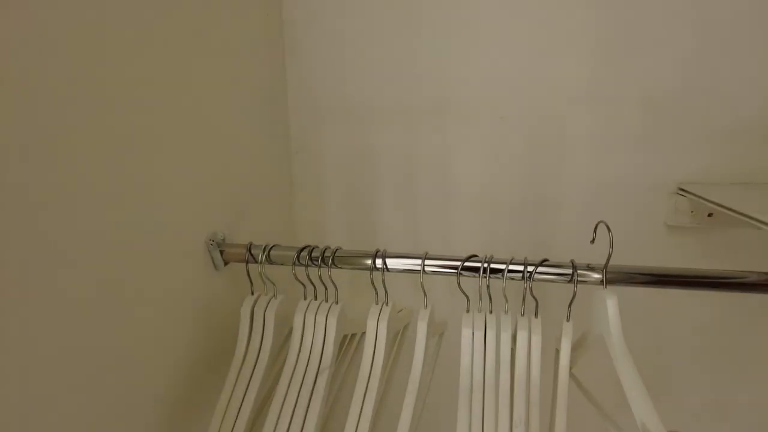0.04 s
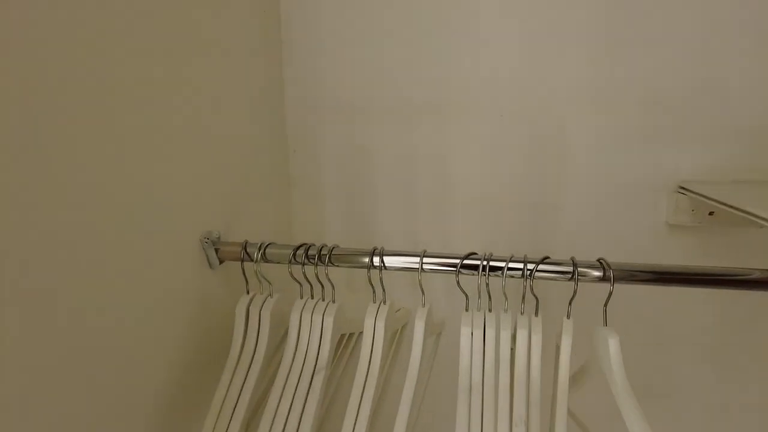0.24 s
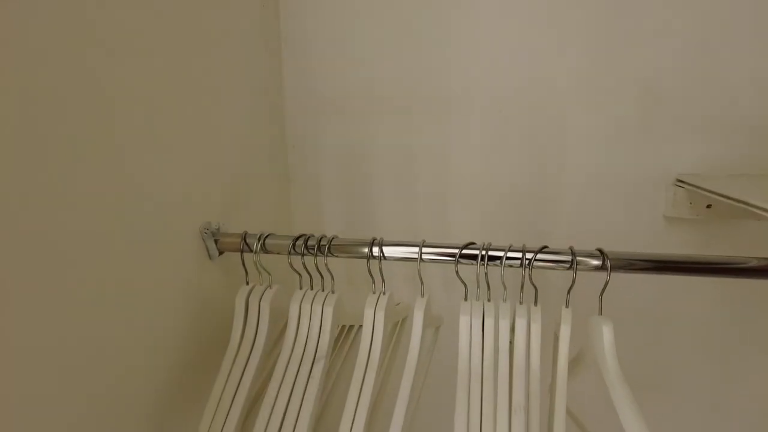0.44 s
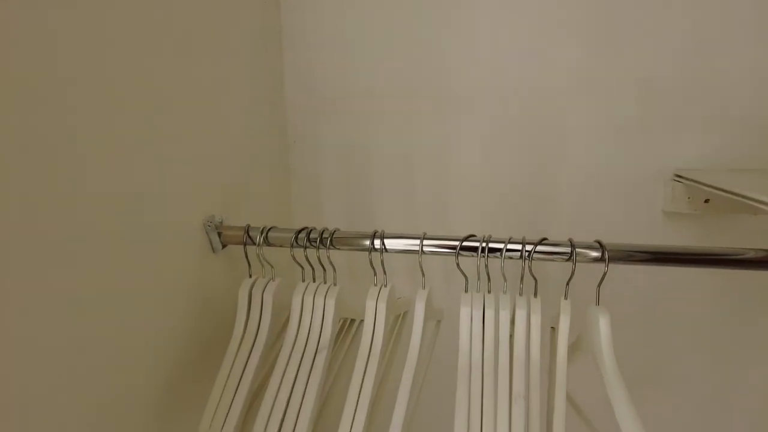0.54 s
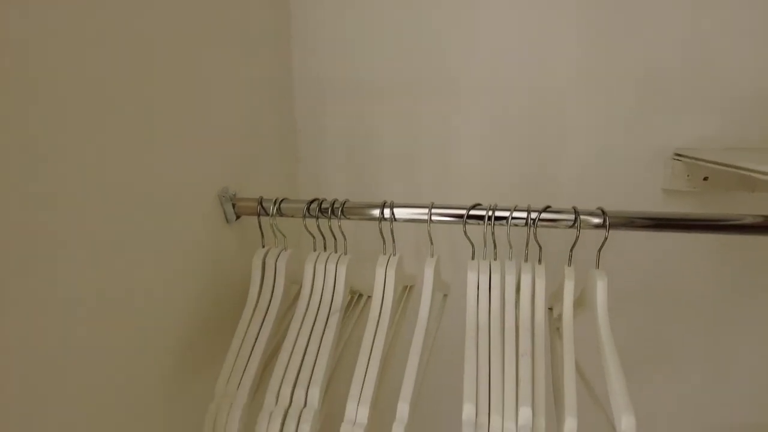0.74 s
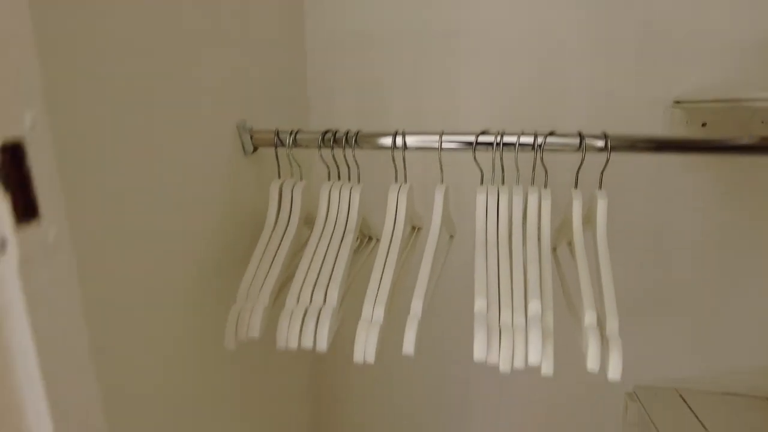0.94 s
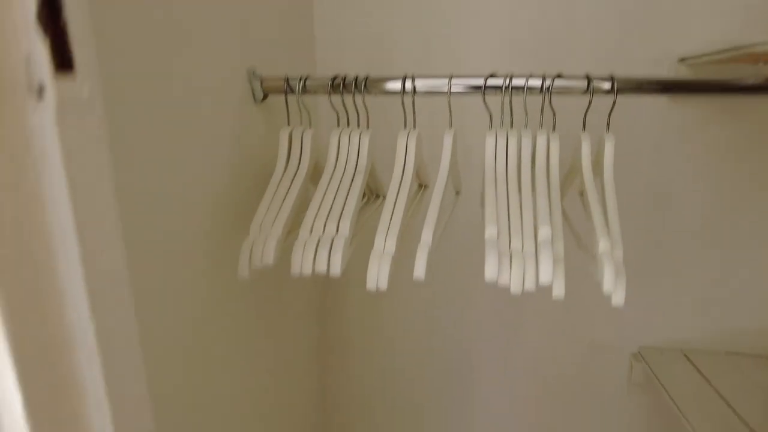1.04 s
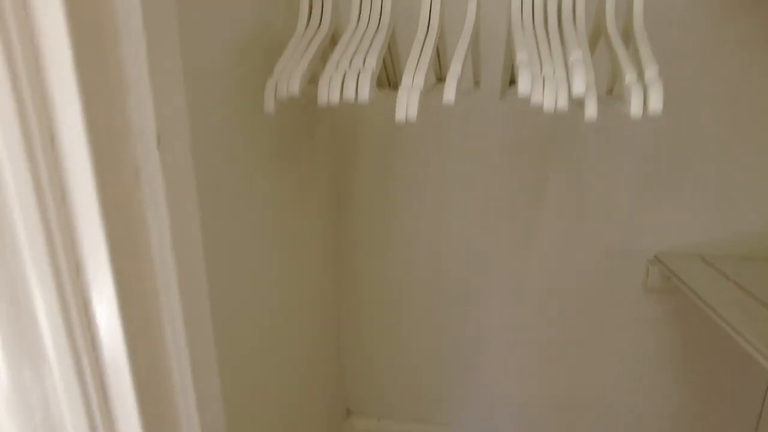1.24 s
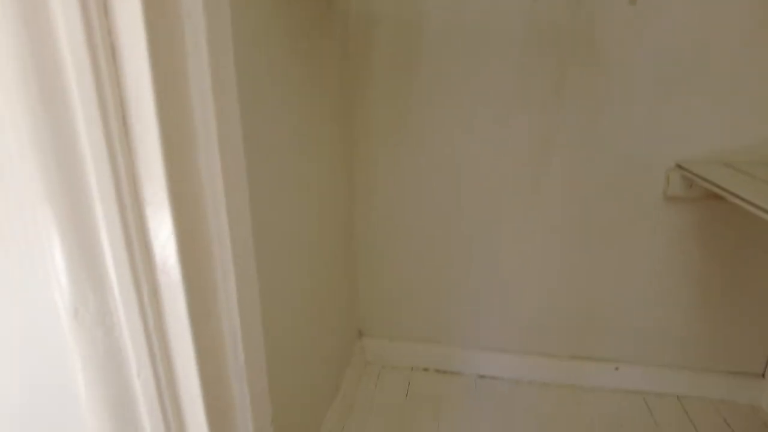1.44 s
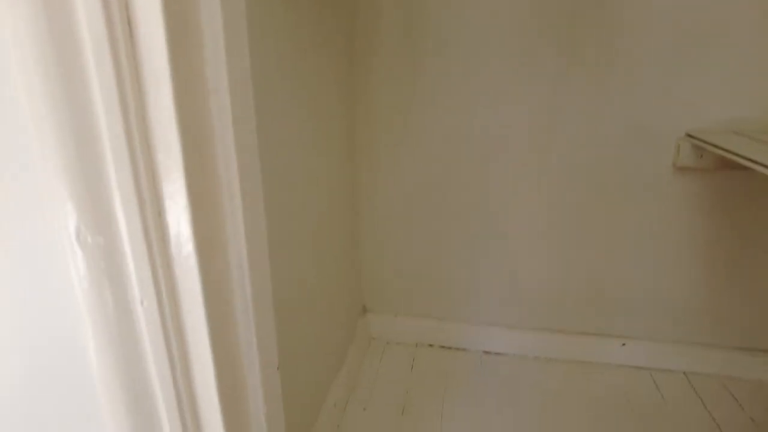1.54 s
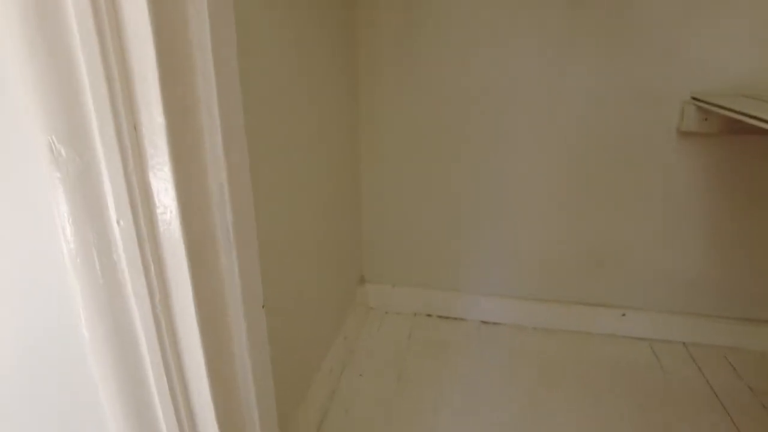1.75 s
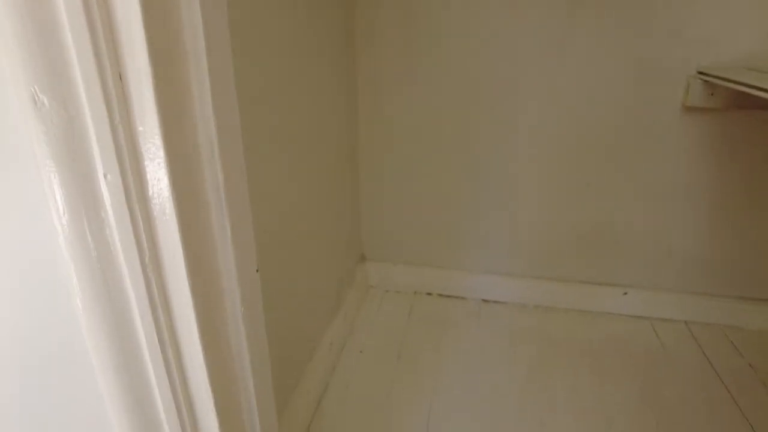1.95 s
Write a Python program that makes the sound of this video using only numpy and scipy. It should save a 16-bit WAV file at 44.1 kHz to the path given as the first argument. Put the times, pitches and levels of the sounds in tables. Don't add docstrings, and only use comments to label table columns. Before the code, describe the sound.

A wire hanger hook clacks sharply onto a hollow steel rail, bounces and rings, then hangers tick faintly and a thin plastic bag rustles briefly; small bare closet, close handheld microphone with low grip rumble.

```python
import sys
import numpy as np
from scipy import signal
from scipy.fft import rfft, irfft
from scipy.io import wavfile
from scipy.ndimage import uniform_filter1d

SR = 44100
rng = np.random.default_rng(int(sys.argv[2]) if len(sys.argv) > 2 else 0)


def digitize_waveform(pressure):
    field = np.atleast_2d(pressure).T
    bounded = np.clip(field, -1, 1)
    quanta = np.round(bounded * 32767).astype(np.int16)
    wavfile.write(sys.argv[1], SR, quanta)


def volts_from_db(level):
    exponent = np.asarray(level, float) / 20
    return 10 ** exponent


N = 88200


def unit(x):
    return x / np.sqrt(np.mean(x ** 2))


def colour(x, table):
    hz, db = np.array(table, float).T
    f = np.maximum(np.fft.rfftfreq(x.shape[-1], 1 / SR), 1)
    gain = volts_from_db(np.interp(np.log(f), np.log(hz), db))
    return irfft(rfft(x) * gain, x.shape[-1])


def pair(mid, side, table):
    side = colour(side, table)
    return np.array([mid + side, mid - side])


def walk(rate_hz):
    k = int(SR / rate_hz)
    steps = np.repeat(rng.standard_normal(N // k + 1), k)
    return unit(uniform_filter1d(uniform_filter1d(steps, k), k)[:N])


def ring(times, dbs, modes, rise_s, echo_db, echo_t60_s, waver_hz):
    t = np.arange(SR) / SR
    ports = np.array([[.5j], [-.5j]])
    push = np.zeros((1, N))
    push[0, (np.array(times) * SR).astype(int)] = volts_from_db(np.array(dbs))

    def fade(t60_s):
        return np.exp(-np.log(1000) * t / t60_s)

    body = 0
    for hz, db, t60_s, lead in modes:
        a, b, c = (walk(waver_hz)[:SR] for _ in range(3))
        echo = volts_from_db(echo_db) * fade(echo_t60_s) * (a + 1j * b) * np.exp(lead * c * ports)
        waver = 0.9 * min(hz / 700, 1) * (c - c[0])
        direct = fade(t60_s) * np.exp(lead * ports + 1j * waver)
        body = body + volts_from_db(db) * np.imag((direct + echo) * np.exp(2j * np.pi * hz * t))
    swell = 1 - np.exp(-t / rise_s)
    return signal.fftconvolve(push, body * swell, axes=1)[:, :N]


def grains(rate_per_s, spread_db):
    hit, size, sign = rng.random((3, N))
    level = volts_from_db(-spread_db * np.log(size + 1e-9))
    return unit((hit < rate_per_s / SR) * level * (sign - .5))


def bursts(times, dbs, lengths, lead_in_db):
    t = np.arange(N) / SR
    level = 0
    for s, db, length in zip(times, dbs, lengths):
        lead_in = volts_from_db(lead_in_db) * np.exp(np.minimum(t - s, 0) / 0.0042)
        level = level + volts_from_db(db) * np.where(t >= s, np.exp(-((t - s) / length) ** 2), lead_in)
    return level


# pitch_hz, level_db (per Hz)
AIR_COLOUR = [(12, -24.5), (20, 0.5), (210, -5), (459, -14.5), (1000, -25), (1330, -17), (1900, -25.5),
              (3840, -28), (16000, -41)]
# pitch_hz, side_minus_mid_db
AIR_SIDE = [(60, -26.5), (110, -19), (200, -8), (380, -13), (700, 4.5), (1290, -1.5), (2380, -2),
            (4400, -2), (8120, -2), (15000, 1.5)]
# start_s, level_db
GRIP = [(0.0, -37.5), (0.158, -78), (0.19, -49.5), (0.27, -52), (0.45, -54), (0.47, -47.5), (0.779, -61.5),
        (1.15, -58), (1.19, -71.5), (1.22, -61), (1.35, -45), (1.37, -55.5), (1.68, -47), (1.72, -59),
        (1.75, -53), (2.0, -66)]


def room_and_grip():
    air = unit(pair(*colour(rng.standard_normal((2, N)), AIR_COLOUR), AIR_SIDE))
    rumble = unit(colour(rng.standard_normal(N), [(12, -16.0), (33, 15.5), (60, -8), (120, -45.5)]))
    air = air * volts_from_db(-62.5 + 0.53 * walk(6))
    s, db = np.array(GRIP).T
    hold_db = np.interp(np.arange(N) / SR, s, db)
    return air + rumble * volts_from_db(hold_db - 5.5 + 1.2 * walk(6.5))


# start_s, level_db
BAG_EFFORT = [
    (1.522, -93),
    (1.539, -49.5),
    (1.565, -41.5),
    (1.593, -31),
    (1.626, -35.5),
    (1.678, -36.5),
    (1.698, -54.5),
    (1.749, -46),
    (1.868, -57.5),
]
# pitch_hz, level_db (per Hz)
BAG_COLOUR = [(100, -6), (250, -3.5), (500, -1), (850, -8.5), (1300, -4), (3000, -5), (8000, -5),
              (16000, -17.5)]


def bag():
    s, db = np.array(BAG_EFFORT).T
    effort = volts_from_db(np.interp(np.arange(N) / SR, s, db, left=-120) - 6.5 + 0.92 * walk(40))
    crinkles = grains(rate_per_s=9000, spread_db=1.6)
    return unit(colour(crinkles, BAG_COLOUR)) * effort


# start_s, level_db, length_s, pitch_hz (centre)
SCRAPES = [(.001, -37, 0.012, 1000), (.002, -42, 0.014, 4800), (.016, -34.5, .012, 684),
           (0.111, -52.5, 0.02, 4200), (.128, -46.5, 0.016, 4400), (.152, -63, 0.03, 4000),
           (0.132, -59.5, 0.078, 9617), (0.495, -60, 0.021, 9202), (0.539, -49, 0.0064, 1695),
           (0.567, -70, 0.099, 5970), (1.035, -78, .012, 2200), (1.023, -61, 0.0065, 2900),
           (1.023, -61, 0.008, 6000), (1.14, -54.5, 0.011, 2750), (1.141, -69.5, 0.012, 6200),
           (1.356, -67.5, 0.052, 1957), (1.446, -66.5, 0.04, 5180), (1.46, -63.5, 0.065, 2335),
           (1.621, -35, 0.008, 1180), (1.904, -46.5, 0.0019, 4300), (1.909, -57, 0.02, 166),
           (1.907, -47.5, 0.015, 1700), (1.982, -47.5, 0.0093, 2860), (1.993, -47.5, 0.02, 2000),
           (1.96, -56, 0.057, 7700), (.43, -61, 0.08, 5340)]


def scrapes():
    out = 0
    for s, db, length_s, hz in SCRAPES:
        slope = [(hz / 64, -6 * 8), (hz, 0), (hz * 64, -6 * 13)]
        rub = unit(colour(rng.standard_normal(N), slope))
        out = out + rub * bursts([s], [db - 2.5], [length_s], lead_in_db=-28.5)
    return out


# start_s, pitch_hz, level_db, t60_s
CLINKS = [(0.206, 1850, -23.5, 0.045), (0.213, 1327, -23.5, 0.067), (.296, 857, -25, 0.18),
          (.303, 1054, -31, 0.088), (.285, 602, -41, 0.091), (.383, 880, -28, 0.11),
          (.548, 4300, -61.5, 0.1), (.63, 4300, -69.5, .4), (1.022, 2900, -62, .04),
          (1.138, 1925, -53, 0.057), (1.141, 3380, -50, .04), (1.905, 4400, -53.5, 0.042),
          (1.906, 2240, -52, 0.036), (1.91, 1700, -56, 0.099), (1.91, 161, -51.5, 0.24)]


def clinks():
    out = 0
    for s, hz, db, t60_s in CLINKS:
        out = out + ring([s], [db], [(hz, 0, t60_s, .7)], 0.00094, echo_db=-16, echo_t60_s=0.1, waver_hz=100)
    return out


# start_s, ring_db, thump_db
TICKS = [
    (1.142, -53.5, -95),
    (1.174, -63, -65.5),
    (1.211, -72, -81),
    (1.339, -77.5, -83),
    (1.444, -72, -78.5),
    (1.906, -63, -60.5),
]
# pitch_hz, level_db, t60_s, left_lead_rad
PLASTIC = [(880, -9.5, 0.58, 1), (1283, 2, 0.31, 0.72), (1490, -16.5, 0.1, .5), (1770, -3.5, 0.13, 0.37),
           (1884, 5, 0.064, 0.57), (2000, -9, 0.14, .7), (2568.5, -11, 0.065, 0.78),
           (2680, -27, 0.054, 0.84), (3343, 1.5, 0.016, 0.9), (4200, -21.5, .03, 0.82),
           (6560, -22, .04, .8)]
# pitch_hz, level_db, t60_s, left_lead_rad
WALL = [(99.2, -5, 0.68, .05), (132.5, -11.5, 0.087, .1), (170.9, -6.5, 0.83, .15),
        (185.2, -1.5, 0.19, .15), (210.8, 7, 0.4, 0.18), (261.6, 2, 0.2, 0.5), (278.26, -4, .25, 0.31),
        (326.3, -2, 0.3, 0.83), (420.3, -11.5, 0.12, 0.84), (507, -5.5, 0.22, 1)]


def hangers():
    s, ring_db, thump_db = np.array(TICKS).T
    shoulder = ring(s, ring_db, PLASTIC, 0.001, echo_db=-9.5, echo_t60_s=0.21, waver_hz=160.5)
    thump = ring(s, thump_db, WALL, 0.0023, echo_db=1.5, echo_t60_s=0.13, waver_hz=79)
    return shoulder + thump


# pitch_hz, level_db, t60_s, left_lead_rad
NEIGHBOUR = [(4330, -62, 0.0947, 1.266), (3042.5, -63.5, 0.29, 3.2), (1545, -56, .06, 0.55),
             (1870, -57, 0.056, 0.77), (4300, -80, 0.97, 1.357)]


def neighbour_hook():
    return ring([.546], [0], NEIGHBOUR, 0.0011, echo_db=-17, echo_t60_s=0.75, waver_hz=57)


# pitch_hz, level_db, t60_s, left_lead_rad
KNOCK = [(272, -34, .14, 0.33), (327, -28.5, 0.083, 0.74), (496, -43.5, .2, .9), (605, -34, .2, 1.1),
         (855, -30.5, 0.15, 1.1), (1064, -44.5, 0.12, .8), (1427, -50.5, .3, .7), (1700, -43.5, 0.096, .6)]


def knock():
    return ring([.014], [0], KNOCK, 0.0024, echo_db=-17, echo_t60_s=.5, waver_hz=45)


# start_s, chatter_db, chatter_length_s, rail_ring_db, wall_thump_db
HOOK = [
    (.013, -52, 0.004, -50, -41),
    (.208, -12.5, 0.016, -15, -32.5),
    (.224, -33.5, 0.0074, -24, -32),
    (.236, -26.5, 0.012, -30, -37),
    (.273, -22.5, 0.011, -35, -39.5),
    (.285, -30, 0.014, -40.5, -44),
    (0.296, -40, 0.014, -30, -42),
    (.322, -37.5, 0.012, -57, -47),
    (.385, -53.5, 0.02, -41, -50),
]
# pitch_hz, level_db (per Hz)
CHATTER_COLOUR = [(300, -12), (900, -8.5), (1900, -7), (2300, -9), (4000, -6), (6000, -5), (9000, -1.5),
                  (16000, -17)]


def hook_chatter():
    s, db, length_s, _, _ = np.array(HOOK).T
    clicks = grains(rate_per_s=12000, spread_db=1.6)
    return unit(colour(clicks, CHATTER_COLOUR)) * bursts(s, db - 2.5, length_s, lead_in_db=-10)


def wall_ring():
    s, _, _, _, wall_db = np.array(HOOK).T
    return ring(s + 0.0069, wall_db, WALL, 0.0082, echo_db=-12.0, echo_t60_s=0.71, waver_hz=40)


# pitch_hz, level_db, t60_s, left_lead_rad
WIRE = [(3145, -10, 1, .8), (3227, 0.5, 0.35, 1.4), (3978, -2.5, 0.17, 0.84), (5540, -14, .55, 0.54),
        (6760, -10, 0.22, 1.2), (7720, 4.5, 0.2, 1.2), (9000, -3.5, .13, 1.4), (11200, -5, 0.11, 1.3),
        (11800, -4.5, .12, 1.1)]


def wire_ring():
    s, db, _, _, _ = np.array(HOOK).T
    return ring(s, db - 22.5, WIRE, .003, echo_db=-29, echo_t60_s=0.51, waver_hz=45)


# pitch_hz, level_db, t60_s, left_lead_rad
RAIL = [(575, -9, 0.42, 3.7), (616.5, 2.5, .22, 1.1), (737, -2, 0.18, 1.2), (785, -4, 0.22, 1.8),
        (834.6, 9, 0.1, 0.82), (913, 0, 0.086, 1.1), (1075, -16, 0.2, .8), (1329.3, -9.5, 0.12, 0.64),
        (1800, -11, 0.05, 0.55), (1874, -15.5, 0.25, 0.55), (2464, -16, 0.3, 0.55),
        (2870, -15.5, 0.3, 0.43)]


def rail_ring():
    s, _, _, rail_db, _ = np.array(HOOK).T
    return ring(s + .005, rail_db, RAIL, .011, echo_db=-26, echo_t60_s=0.74, waver_hz=45)


# pitch_hz, t60_s
CLOSET_T60 = [(200, 0.76), (1000, 0.49462), (3000, 0.39), (8000, 0.18), (14000, 0.14)]
# pitch_hz, side_minus_mid_db
CLOSET_SIDE = [(60, -34.5), (110, -26), (200, -16.5), (380, -10), (700, 6.5), (1290, -5.5), (2380, -4),
               (4400, 0), (8120, -4.5), (15000, 5.5)]


def closet(x):
    t = np.arange(SR) / SR
    hz, t60_s = np.array(CLOSET_T60).T
    tail = 0
    for f in 125 * 2 ** np.arange(0, 7.1, .5):
        sos = signal.butter(2, [f / 2 ** 0.21, f * 2 ** .25], "band", fs=SR, output="sos")
        fade = np.exp(-np.log(1000) * t / np.interp(np.log(f), np.log(hz), t60_s))
        tail = tail + signal.sosfilt(sos, rng.standard_normal((2, SR))) * fade
    tail = tail * (1 - np.exp(-t / 0.0016))
    tail = pair(*tail, CLOSET_SIDE) * volts_from_db(-2) / np.sqrt(np.sum(tail[0] ** 2))
    turn = np.exp(-1j * np.pi * np.fft.rfftfreq(N, 1 / SR) * 7e-5 * np.array([[1], [-1]]))
    direct = irfft(rfft(x) * turn, N)
    return direct + signal.fftconvolve(x[None], tail, axes=1)[:, :N]


def scene():
    chatter = hook_chatter()
    hook_rings = rail_ring() + wire_ring() + wall_ring() + neighbour_hook()
    contacts = closet(chatter + scrapes() + bag())
    return contacts + hook_rings + hangers() + room_and_grip() + knock() + clinks()


def top_cut(x):
    return signal.sosfilt(signal.butter(12, 15870, fs=SR, output="sos"), x)


def record(dry):
    cut = signal.sosfilt(signal.ellip(8, .2, 70, 15870, fs=SR, output="sos"), dry)
    return top_cut(cut)


dry = scene()
out = record(dry)
digitize_waveform(out)
```